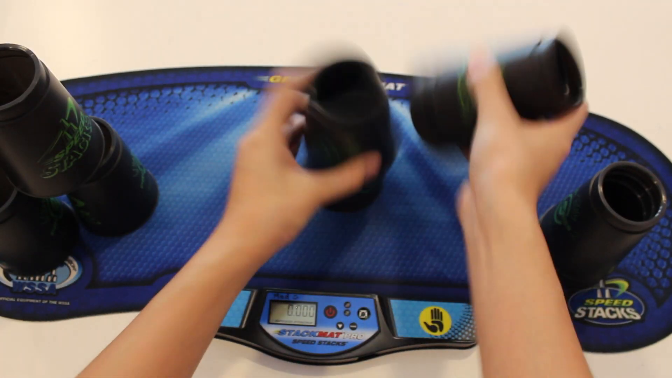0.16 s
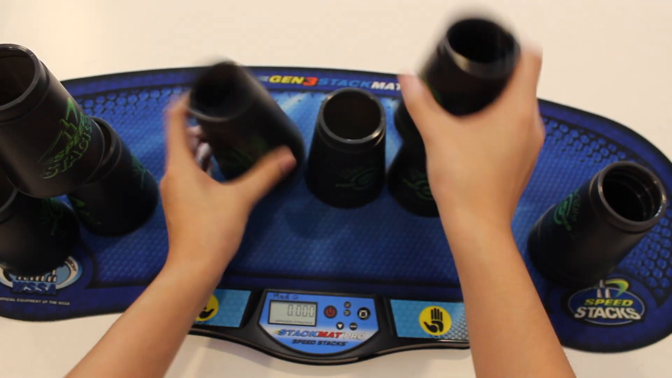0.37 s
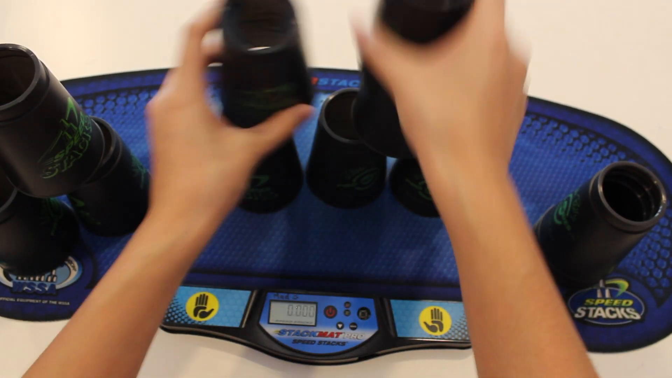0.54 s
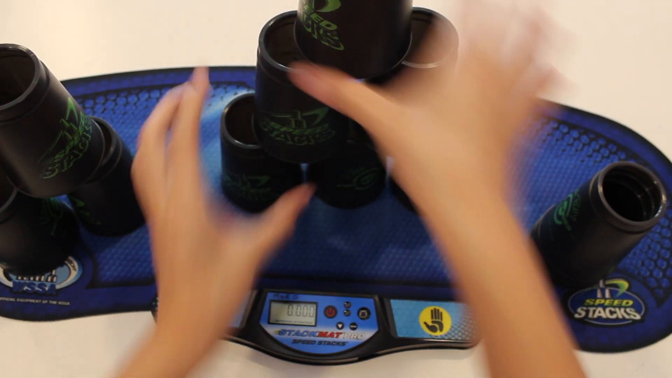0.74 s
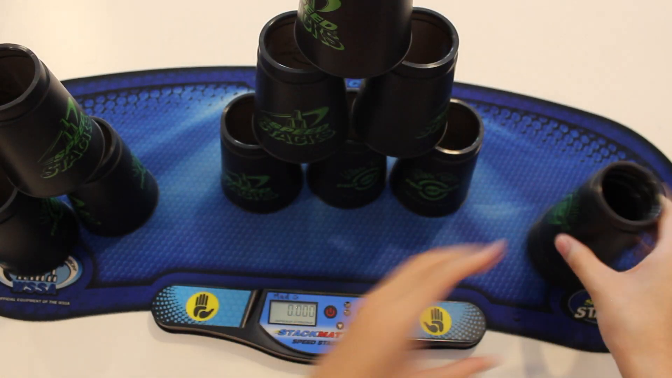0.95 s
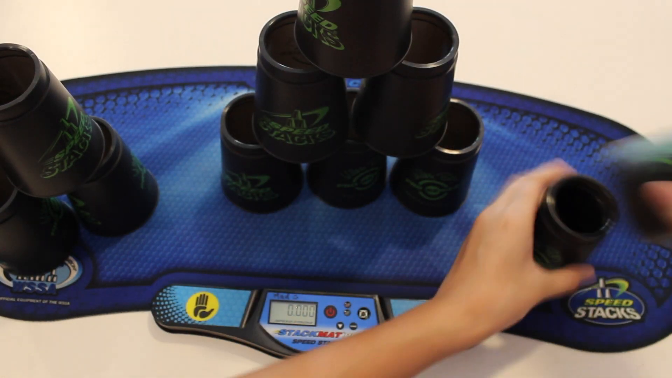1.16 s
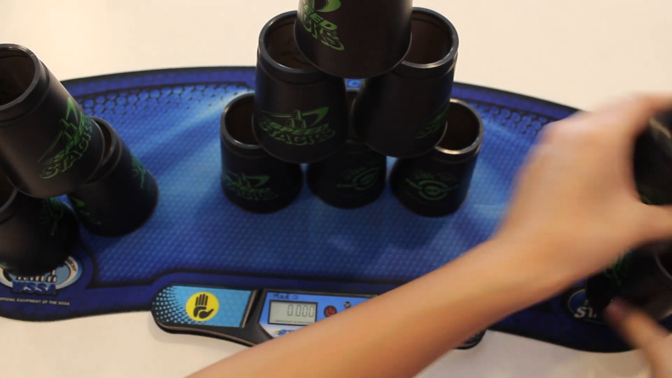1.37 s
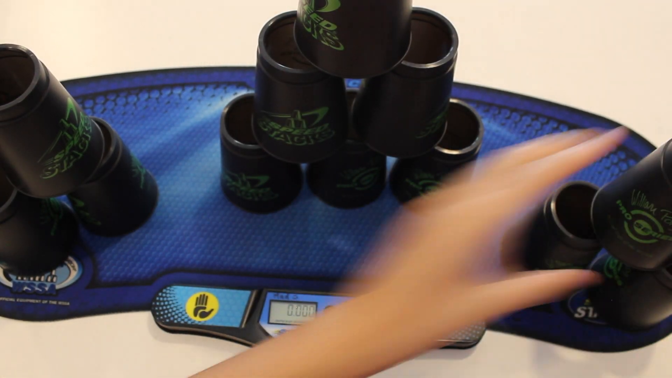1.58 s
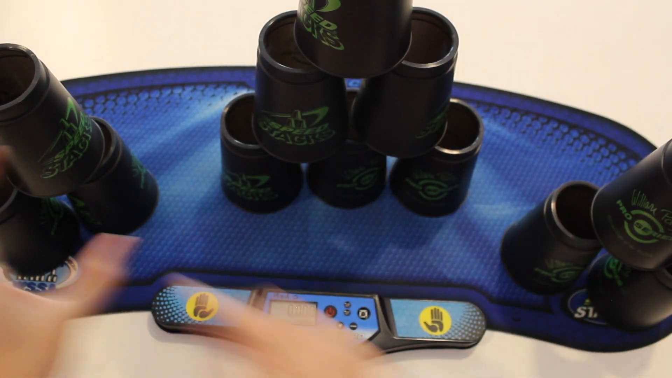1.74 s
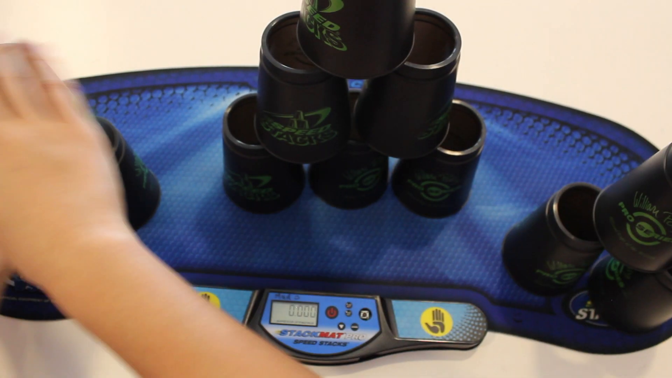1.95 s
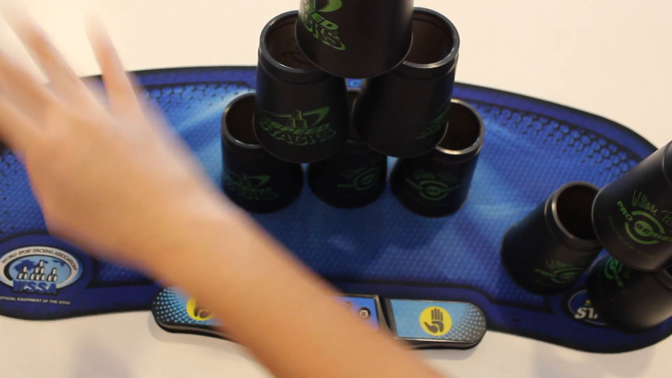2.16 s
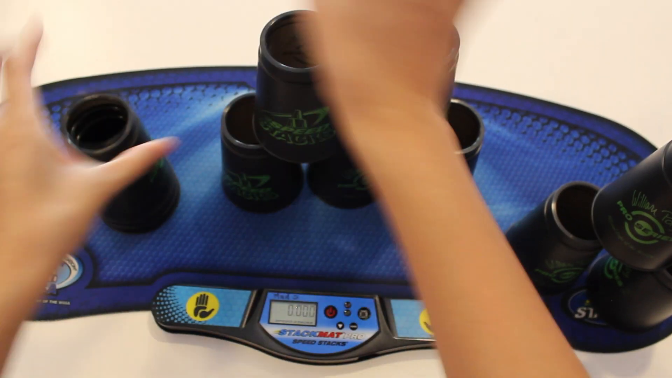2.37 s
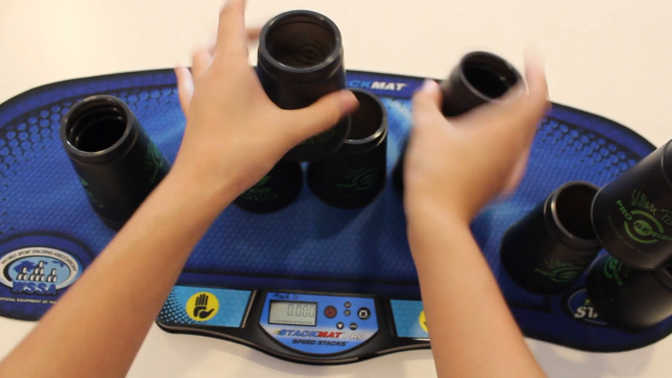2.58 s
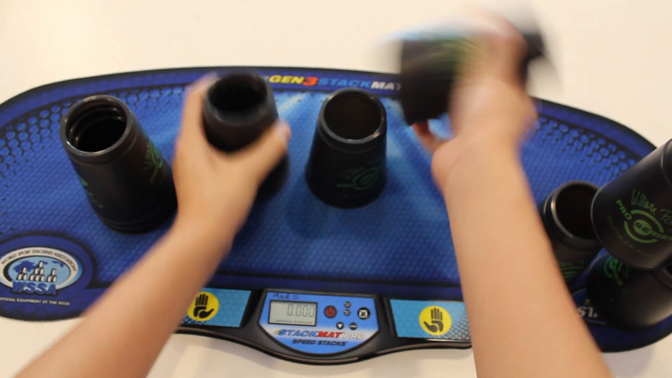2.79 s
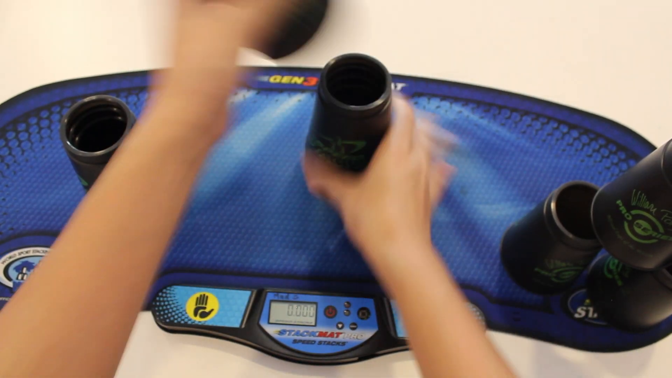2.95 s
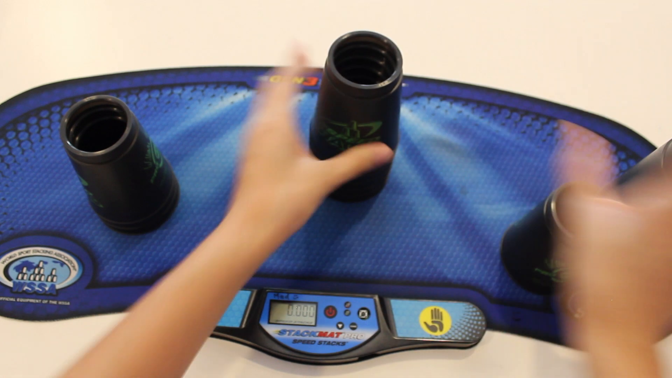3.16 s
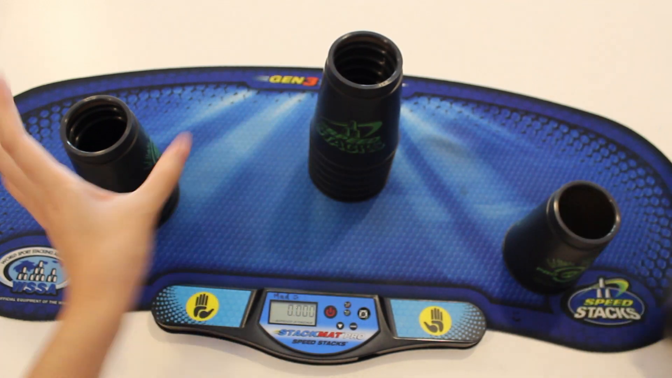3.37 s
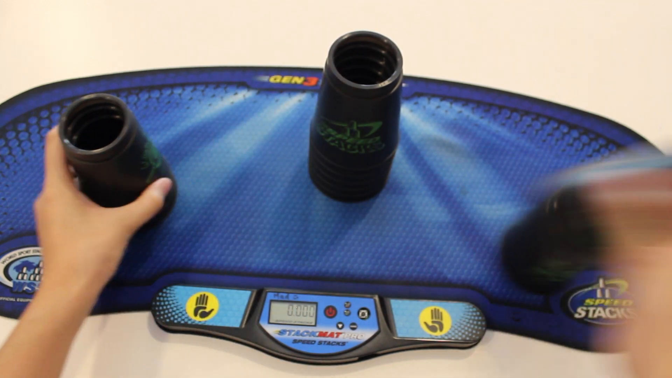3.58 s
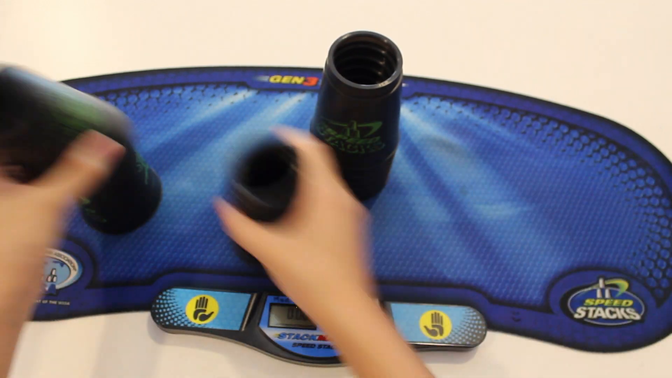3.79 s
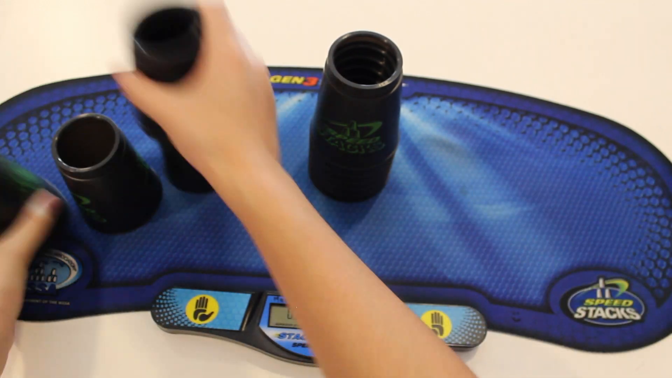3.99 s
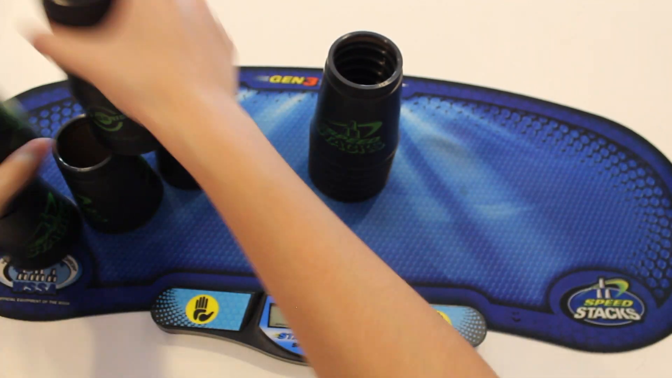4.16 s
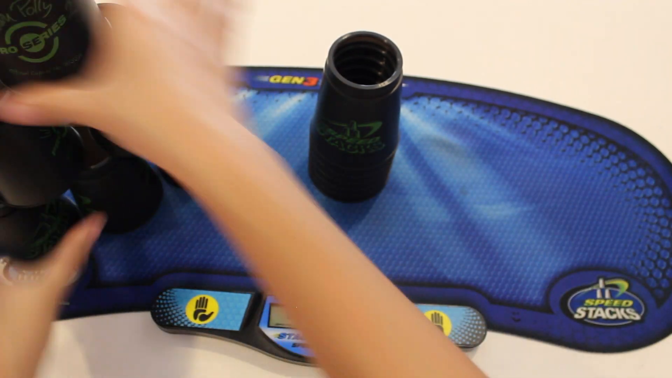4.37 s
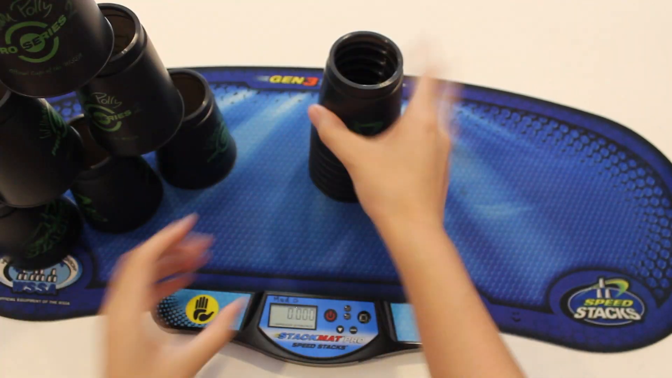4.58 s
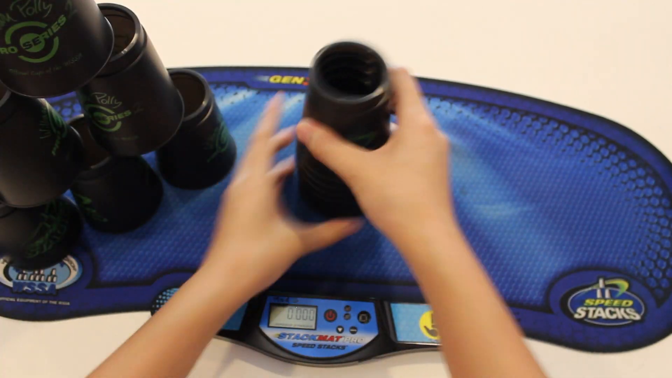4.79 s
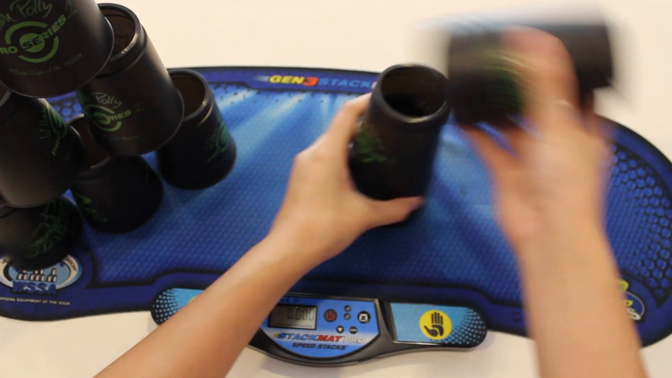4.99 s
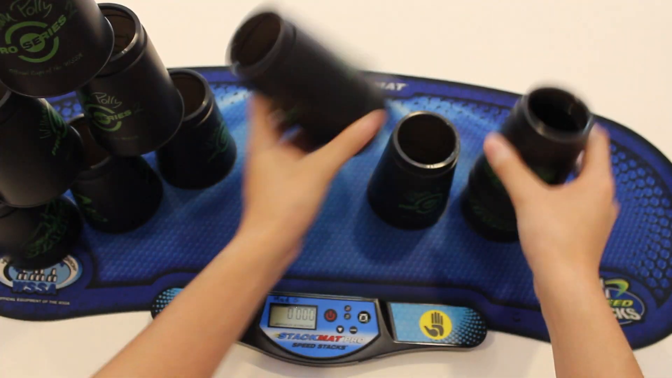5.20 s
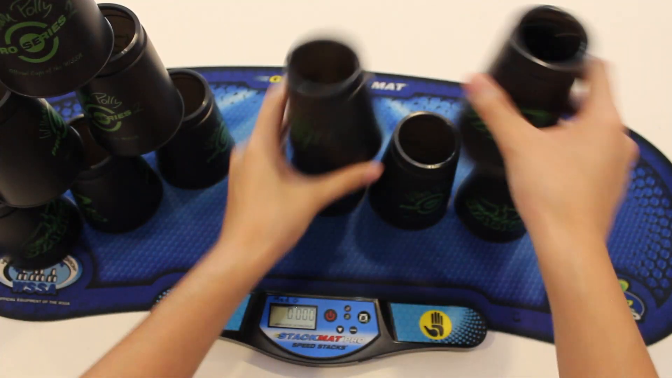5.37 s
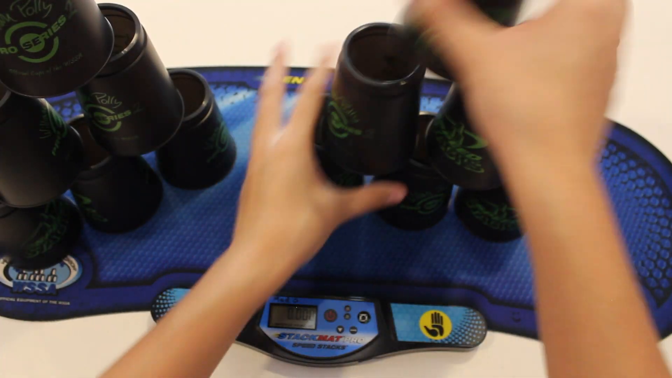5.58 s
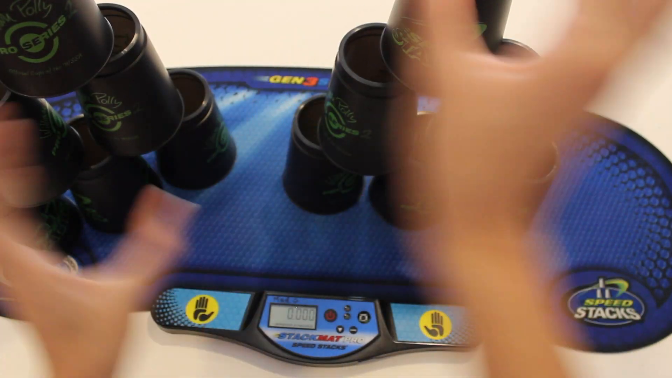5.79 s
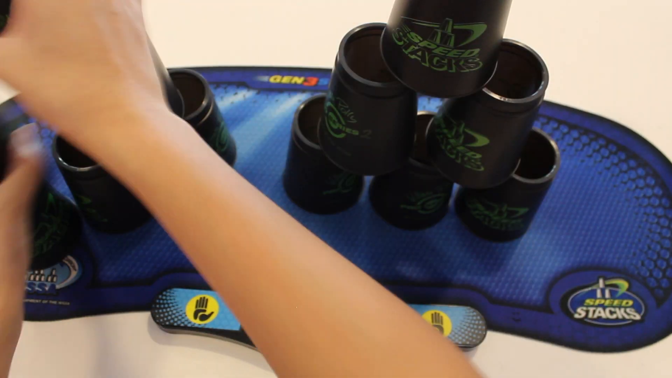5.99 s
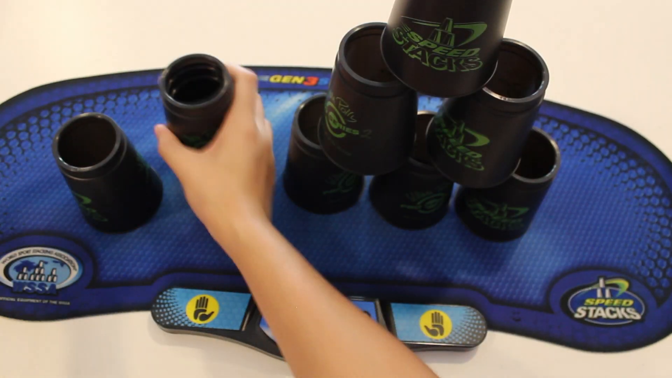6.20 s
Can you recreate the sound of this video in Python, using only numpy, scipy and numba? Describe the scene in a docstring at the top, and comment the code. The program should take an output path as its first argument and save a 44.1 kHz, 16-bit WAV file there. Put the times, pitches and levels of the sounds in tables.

```python
"""Hard plastic cups are stacked and unstacked fast on a thin mat over a table, close to a small microphone.
It opens with clacks, thuds and a brief rim squeak, over rustling hands and quiet room air. Sparser knocks
follow, then a busy run from about 2 s, scattered groups from 4 s and a dense burst with rising rustle at the end.
Each contact is a noisy crack, a short ring of the cup wall and a hollow knock of the air inside; cups slide
with a grainy hiss, a small room answers with fading noise, and the loudest clacks overload the recorder."""
import sys
import numpy as np
from scipy import signal
from scipy.fft import rfft, irfft
from scipy.io import wavfile
from scipy.ndimage import uniform_filter1d
from numba import njit

SR = 44100
rng = np.random.default_rng(int(sys.argv[2]) if len(sys.argv) > 2 else 0)


def pcm_store(signal):
    """Save signal as 16-bit PCM."""
    levels = np.round(np.clip(np.atleast_2d(signal), -1, 1) * 32767)
    wavfile.write(sys.argv[1], SR, levels.astype(np.int16).T)


def how_loud(loudness_db):
    """Turn decibels into a plain amplitude multiplier (0 dB gives 1, 20 dB gives 10)."""
    steps = np.asarray(loudness_db, float) / 20
    return 10 ** steps


N = 275184

# room air, its tone colour: (frequency [Hz], relative level per Hz [dB])
AIR_COLOUR = [(20, -10), (75, -9.5), (100, 2), (135, -14.5), (195, 3), (245, -15), (700, 0.5), (1500, -8.5),
              (3400, -17.5), (9600, -30), (16000, -29)]
# hands moving cups over the mat: (time [s], rustle level [dB])
HANDS = [(0.0, -50), (0.6, -35.5), (0.85, -77), (1.08, -51.5), (1.34, -45), (1.7, -68), (1.92, -52.5),
         (2.05, -42), (3.1, -42.5), (3.44, -41.5), (3.6, -48), (4.25, -40), (4.48, -83), (4.69, -52),
         (5.06, -44.5), (5.7, -33), (5.9, -56.5), (6.24, -29.5)]
# skin and rims on the mat, tone colour: (frequency [Hz], relative level [dB])
RUSTLE_COLOUR = [(500, 0), (1300, 0), (3000, -4.5), (5500, -10.5), (8000, -16), (16000, -23.5)]
# table top and standing cups, shaken by every knock:
# (frequency [Hz], relative level [dB], time to fall by 60 dB [s])
TABLE_MODES = [(203.2, -13, 0.18), (272.8, 1.5, 0.067), (294.2, -1, 0.11), (364, -4, 0.17),
               (399.3, -11, 0.18), (442.5, -2.5, 0.086), (555.4, -6, 0.12), (622, -1, 0.056),
               (696, -2, 0.073), (765.7, -4.5, 0.08), (906, -21, 0.19), (1018, -12, 0.093),
               (1130, -19, 0.11), (1240, -17, 0.048)]
# a rim drags its wall tone along:
# (time [s], length [s], start frequency [Hz], end frequency [Hz], level [dB])
SQUEAKS = [(.335, 0.071, 2900, 3450, -35.5), (9, 0.1, 3500, 2200, -42), (.345, 0.048, 5400, 5900, -37.5)]
# cups drawn out of or dropped into each other: (time [s], length [s], level [dB], centre frequency [Hz])
RUBS = [(0.008, 0.052, -42, 3800), (0.337, 0.072, -35.5, 4700), (1.05, 0.12, -53.5, 3000),
        (1.188, 0.17, -54.5, 2180), (1.291, 0.072, -44, 400), (1.955, 0.019, -29.5, 1760),
        (2.027, 0.016, -28.5, 1310), (2.13, 0.022, -35, 2520), (2.323, 0.085, -40, 4440),
        (2.502, 0.062, -26, 2200), (2.648, 0.035, -29.5, 1920), (2.754, 0.081, -39, 3600),
        (2.906, 0.063, -42, 3100), (3.308, 0.06, -34, 3500), (3.413, 0.057, -34, 1950),
        (3.68, 0.023, -27, 2670), (3.712, 0.02, -17.5, 2900), (3.744, 0.048, -26.5, 2310),
        (3.79, 0.075, -31, 1910), (4.081, 0.019, -33, 3000), (4.879, 0.1, -37.5, 1900),
        (5.037, 0.083, -38, 3600), (5.221, 0.05, -37, 2800), (5.369, 0.061, -36, 3000),
        (6.013, 0.045, -35.5, 1750), (6.128, 0.039, -41, 3100)]
# colour of a rub: (multiple of its centre frequency [-], relative level [dB])
RUB_COLOUR = [(.15, -15), (.4, 1), (1, 1.5), (2.2, -3.5), (5, -16), (12, -32)]
# room echo: (band centre [Hz], time for the main decay to fall by 60 dB [s], relative level [dB])
ROOM_BANDS = [(259, 0.19, -11.5), (663, 0.25, -5.5), (1300, 0.27, -7), (3000, 0.32, -13), (5660, 0.26, -10),
              (12600, 0.14, -11)]
# cup wall tones before chance shifts: (frequency [Hz], relative level [dB], time to fall by 60 dB [s])
WALL_MODES = [(1240, -5.5, 0.024), (1670, 13.5, 0.0041), (1944, 0, 0.017), (2860, -9, 0.038),
              (2990, -4, 0.033), (3300, -3.5, 0.036), (3965, -3.5, 0.034), (5470, 3.5, 0.016),
              (6410, -7.5, 0.039)]
# colour of a crack: (frequency [Hz], relative level [dB])
CRACK_COLOUR = [(800, 2.5), (2000, 1), (5000, 6.5), (7500, 0), (12000, -5), (17000, -11.5)]
# rim strikes rim:
# (time [s], relative crack level [dB], loudest wall tone [Hz], relative wall level [dB])
CLACKS = [(0.0034, -26, 2930, -25), (0.1402, -35, 1590, -31), (0.193, -24, 1230, -17),
          (0.4541, -3, 3100, -2), (0.7194, 1, 1350, 4.5), (1.9607, -37, 2150, -16),
          (2.032, -17.5, 1120, -6), (2.0764, -8, 3300, -7.5), (2.0967, -7, 5340, -6),
          (2.101, -21, 1530, -7.5), (2.1064, -4, 3130, -0.5), (2.1508, 3, 1945, -1),
          (2.191, -14.5, 1830, -3), (2.3142, -20.5, 5700, -36), (2.3423, -26, 1220, -35),
          (2.366, -12, 4880, -28), (2.4299, -19, 1380, -14), (2.49, -9.5, 4550, -25),
          (2.495, -8, 2800, -43), (2.577, -0.5, 2100, -4.5), (2.6273, -22, 3160, -11.5),
          (2.6416, -12, 1440, -3.5), (2.744, -15.5, 3300, -18), (2.77, -46.5, 3200, -26),
          (2.9117, -22.5, 3200, -20), (2.928, -24, 3050, -22), (2.957, -19, 2730, -19),
          (3.0668, -16, 5500, -36.5), (3.113, -25, 1360, -27), (3.1238, -2.5, 1354, 1),
          (3.688, -13, 1290, -23), (3.711, -7.5, 1890, -9), (3.7838, -9.5, 1730, -2),
          (3.823, -16.5, 1560, -20), (4.119, -15, 1790, -29), (4.2133, -16, 1560, -3),
          (4.2658, -23, 1115, -10), (4.312, -28, 1060, -9), (4.3604, -2, 1310, 4.5),
          (5.044, -25, 4300, -23.5), (5.0756, -38, 4500, -20.5), (5.2057, -17, 3030, -15.5),
          (5.2231, -25, 1780, -16), (5.2805, -15, 4050, -15), (5.3578, -1.5, 3020, -0.5),
          (5.5194, -28, 3950, -15), (5.6483, -32, 1240, -7), (6.073, -22, 1210, -42),
          (6.082, -28, 1240, -11), (6.0897, -8, 4700, -6), (6.0929, -0.5, 2960, -11),
          (6.1137, -5.5, 5770, -11), (6.124, -11, 5300, -25), (6.1296, -8, 4700, -37),
          (6.1607, -16, 1820, -34), (6.1714, 5, 2040, 4), (6.1912, -19, 2770, -23)]
# a cup lands mouth down and squeezes its air: (time [s], relative crack level [dB],
# loudest wall tone [Hz], air cavity tone [Hz], relative hollow level [dB])
LANDINGS = [(0.1518, -52, 1040, 250, -18.5), (0.2667, -54, 2700, 325, -13.5), (0.3147, -52, 1084, 314, -29),
            (0.325, -32.5, 2900, 268, -11.5), (0.4418, -10.5, 3170, 350, -16), (0.45, -35, 2830, 290, -1.5),
            (0.5495, -4, 1940, 628, 3), (0.6735, -10.5, 1330, 597, 1), (0.6856, -11.5, 1300, 610, -1),
            (1.022, -42, 1700, 266, -25.5), (1.068, -43, 1600, 378, -36), (1.106, -41.5, 1110, 423, -46),
            (1.245, -43, 4870, 390, -45), (1.3913, -28.5, 2320, 405, 4), (1.4047, -25.5, 1440, 418, 10),
            (1.4868, 1, 1433, 717, 10.5), (1.4935, -26, 1310, 716, -0.5), (2.0152, -41, 1240, 244, -17),
            (2.021, -32.5, 1100, 276, -12), (2.0438, -22, 1120, 264, -11.5), (2.4073, -32, 1450, 303, -26),
            (2.4431, -3.5, 1560, 315, -1.5), (2.5003, -24, 2950, 646, -13.5),
            (2.5437, -14.5, 2970, 590, -13), (2.5539, -41.5, 1280, 650, -8.5), (2.6896, -8, 1700, 848, 0.5),
            (2.7825, -18, 3100, 382, -17), (2.794, -19, 5080, 590, -15.5), (2.8347, -27, 3400, 354, -18),
            (2.904, -26, 1740, 279, -19.5), (2.972, -2.5, 3130, 310, 2.5), (3.278, -58, 1130, 630, -20),
            (3.2965, -31, 1340, 570, -22), (3.3091, -14.5, 3050, 430, -12.5),
            (3.4087, -40, 1270, 440, -18.5), (3.4235, -20.5, 1540, 434, -16), (3.645, -9.5, 3490, 556, 4),
            (3.6561, -14, 1170, 396, -6.5), (3.6829, -12, 1260, 840, -16), (3.7166, -10, 3060, 300, -5),
            (3.729, -8.5, 1950, 370, -4), (3.8258, -21, 1490, 694, -16.5), (4.0086, -42, 1610, 308, -22.5),
            (4.0492, -25, 3300, 298, -7.5), (4.0558, -25.5, 4200, 306, -16.5),
            (4.0791, -18, 2600, 584, -11.5), (4.0878, -31, 3000, 484, -7), (4.1287, -23, 1770, 645, -11.5),
            (4.199, -1, 4250, 645, 6), (4.2903, -10, 1270, 650, -3.5), (4.3024, -11, 1550, 633, 0.5),
            (4.6653, -25.5, 3660, 342, -22.5), (4.8703, -21, 1240, 340, -11),
            (4.8958, -26.5, 3040, 364, -20), (4.9421, -25, 1590, 348, -15), (5.0963, -36, 1200, 400, -24),
            (5.1197, -61.5, 4960, 280, -14), (5.1563, -30, 3220, 263, -21), (5.2014, -60, 1920, 282, -0.5),
            (5.215, -22, 3150, 248, -8.5), (5.351, -26, 1230, 320, 5.5), (5.383, -20, 2860, 370, -4.5),
            (5.4805, -9.5, 1070, 625, 7), (5.5109, -12, 1550, 620, -1), (5.5438, -21, 1570, 680, -13),
            (5.569, -9, 1240, 578, -1.5), (5.6144, -11.5, 1350, 660, -1.5), (5.6648, -0.5, 1240, 622, 5.5),
            (6.0126, -30.5, 1390, 623, -15.5), (6.0622, -21, 1180, 620, -15), (6.1739, -23, 2560, 850, -10),
            (6.2297, -2, 3660, 323, -4.5)]

AIR_DB = -49.5  # average level before the recorder
RUMBLE_DB = -1.5  # through the table, against the rustle
# neighbours shuffle after a landing, against its thud
JOSTLE_DB, JOSTLE_RISE_S, JOSTLE_FALL_S = -38.5, 0.02, 0.031
BODY_TO_ROOM_DB = -8.5  # the narrow tones reach the walls more weakly than the broad blow
# air tone of a struck open cup, against its wall tone; high clacks stir it less
OPEN_CUP_HZ, CLACK_AIR_DB, CLACK_AIR_DB_PER_OCTAVE = 620, -8.5, -3
# wall ring of a landing grows with its crack and its thud (dB per dB)
WALL_PER_CRACK, WALL_PER_HOLLOW, LANDING_WALL_DB = 0.71, 0.28, 1.5
LANDING_WALL_DB_PER_OCTAVE = -3.5  # the mat damps the higher wall tones
TICKS_PER_S, TICK_DB, TICK_SPREAD_DB = 10, 4.5, 4.5  # stray light touches, against the rustle


def colour(x, points):
    """Shapes a signal by (Hz, dB) points without sounding ahead of it (minimum phase)."""
    hz, db = np.transpose(points)
    grid = np.linspace(1, SR / 2, 2049)
    log_gain = np.interp(np.log(grid), np.log(hz), db) * np.log(10) / 20
    # folding the cepstrum forward in time makes the filter minimum phase
    cepstrum = irfft(log_gain)
    cepstrum[1:2048] *= 2
    cepstrum[2049:] = 0
    response = irfft(np.exp(rfft(cepstrum)))[:2048]
    return signal.fftconvolve(x, response)[:len(x)]


def unit(x):
    """Scales to an average (rms) level of 1."""
    return x / np.sqrt(np.mean(x ** 2))


def ring(x, hz, t60):
    """One fading tone driven by x; a single unit push rings at amplitude 1 and falls 60 dB in t60 s."""
    r = np.exp(-np.log(1000) / (t60 * SR))
    w = 2 * np.pi * hz / SR
    return signal.lfilter([0, r * np.sin(w)], [1, -2 * r * np.cos(w), r * r], x)


def add(out, s, x):
    """Mixes x in at time s."""
    i = int(s * SR)
    out[i:i + len(x)] += x[:len(out) - i]


def quiet_air():
    """The quiet air of the room: steady coloured noise."""
    return how_loud(AIR_DB) * unit(colour(rng.standard_normal(N), AIR_COLOUR))


def hands_db(s):
    """Rustle level at time s."""
    return np.interp(s, *np.transpose(HANDS))


def table(shove):
    """Low tones of the table top and of the cups that stand on it, shaken by a push."""
    return sum((-1) ** k * how_loud(db) * ring(shove, hz, t60) for k, (hz, db, t60) in enumerate(TABLE_MODES))


def handling():
    """Hands and cups moving on the mat rustle and shake the table a little, more so just after a landing."""
    power = how_loud(2 * hands_db(np.arange(N) / SR))
    t = np.arange(SR // 2) / SR
    jostle = (1 - np.exp(-t / JOSTLE_RISE_S)) * np.exp(-t / JOSTLE_FALL_S)
    for s, _, _, _, hollow_db in LANDINGS:
        add(power, s, how_loud(2 * (hollow_db + JOSTLE_DB)) * jostle ** 2)
    rumble = unit(table(rng.standard_normal(N)))
    flicker = how_loud(1.6 * unit(uniform_filter1d(rng.standard_normal(N), 300)))
    rustle = unit(colour(rng.standard_normal(N) * flicker, RUSTLE_COLOUR))
    return np.sqrt(power) * (how_loud(RUMBLE_DB) * rumble + rustle)


def squeaks():
    """A rubbed rim sings in a rough, narrow band that glides as the cups part."""
    out = np.zeros(N)
    for s, length, from_hz, to_hz, db in SQUEAKS:
        n = int(length * SR)
        glide = np.exp(2j * np.pi * np.cumsum(np.linspace(from_hz, to_hz, n)) / SR)
        # slow noise on the gliding tone makes it rough
        a, b = uniform_filter1d(rng.standard_normal((2, n)), 110)
        song = unit(np.real((a + 1j * b) * glide))
        add(out, s, how_loud(db) * song * signal.windows.tukey(n, 0.4))
    return out


def rubs():
    """Ridged walls slide over each other: a grainy hiss that also keeps the wall tones ringing."""
    out = np.zeros(N)
    for s, length, db, centre_hz in RUBS:
        n = int(length * SR) + 2048  # room for the fade
        t = np.arange(n) / SR
        grain = how_loud(1.5 * unit(uniform_filter1d(rng.standard_normal(n), 90)))
        push = rng.standard_normal(n) * grain
        # ridges catch now and then, about 500 times a second: small ticks in the hiss
        push = push * (1 + 5.9 * (rng.random(n) < 500 / SR))
        # wall tones far from the centre of the rub answer less
        walls = sum(how_loud(mode_db - 6.1 * abs(np.log2(hz / centre_hz))) * unit(ring(push, hz, t60))
                    for hz, mode_db, t60 in WALL_MODES)
        hiss = colour(push, [(k * centre_hz, gain_db) for k, gain_db in RUB_COLOUR])
        shape = np.clip(t / 0.0027, 0, 1) * np.exp(-np.maximum(t - length, 0) / 0.018)
        add(out, s, how_loud(db) * shape * unit(unit(hiss) + 0.5 * unit(walls)))
    return out


def room(x):
    """Diffuse echo: noise that dies away band by band, starting after the first wall."""
    t = np.arange(SR) / SR
    tail = 0
    for hz, t60, db in ROOM_BANDS:
        sos = signal.butter(2, [hz / 1.5, hz * 1.5], "band", fs=SR, output="sos")
        band = signal.sosfilt(sos, rng.standard_normal(len(t)))
        # the near corner dies fast, the rest of the house lingers
        near = np.exp(-np.log(1000) * t / t60)
        far = how_loud(-23) * np.exp(-np.log(1000) * t / (2.74 * t60))
        band = band * (near + far) * (1 - np.exp(-(t / 0.00097) ** 2))
        # energy in step with band width
        tail = tail + how_loud(db) * band * np.sqrt(2 * hz / SR / np.sum(band ** 2))
    return signal.fftconvolve(x, tail)[:N]


def hits():
    """Every contact as (time, crack dB, wall Hz, wall dB, air Hz, hollow dB), with stray touches by chance."""
    rows = []
    for s, db, hz, wall_db in CLACKS:
        octaves = np.log2(hz / OPEN_CUP_HZ / 2)
        hollow_db = wall_db + CLACK_AIR_DB + CLACK_AIR_DB_PER_OCTAVE * octaves
        rows.append((s, db, hz, wall_db, OPEN_CUP_HZ, hollow_db))
    for s, db, hz, air_hz, hollow_db in LANDINGS:
        octaves = np.log2(hz / OPEN_CUP_HZ / 2)
        wall_db = WALL_PER_CRACK * db + WALL_PER_HOLLOW * hollow_db + LANDING_WALL_DB
        wall_db = wall_db + LANDING_WALL_DB_PER_OCTAVE * octaves
        rows.append((s, db, hz, wall_db, air_hz, hollow_db))
    for when, size, mode, air in rng.random((100, 4))[:int(TICKS_PER_S * N / SR)]:
        s = when * N / SR
        db = hands_db(s) + TICK_DB + TICK_SPREAD_DB * (2 * size - 1)
        wall_hz = WALL_MODES[int(mode * len(WALL_MODES))][0]
        rows.append((s, db, wall_hz, db, OPEN_CUP_HZ * 2 ** -air, db))
    return rows


def hollow_knock(tap, t, air_hz, shift):
    """The trapped air takes a cycle to swing up, and the facing cup answers a little higher."""
    facing = np.sign(shift[0]) * ring(tap, 1.47 * air_hz * (1 + 0.12 * shift[1]), 0.029)
    air = ring(tap, air_hz, 0.028) + how_loud(-13.5) * facing
    return air * (1 - np.exp(-t / 0.0011))


def wall_ring(tap, t, wall_hz, hardness_db, shift, share):
    """The grip picks the loudest wall tone; the others fade with distance from it."""
    # a squeezed cup is not quite round, so that tone splits into a beating pair
    wall = ring(tap, wall_hz, 0.019) + how_loud(-5) * ring(tap, wall_hz * (1 + 0.08 * share[0]), 0.02)
    for (hz, db, t60), a, b in zip(WALL_MODES, shift, share):
        octaves = np.log2(hz / wall_hz)
        # a soft contact spares the high tones
        far_db = -7.0 * abs(octaves) + 0.087 * max(octaves, 0) * min(hardness_db, 0)
        gain = how_loud(db + far_db - 7.5 + 4.86 * b) * np.sign(a)
        wall = wall + gain * ring(tap, hz * (1 + 0.0374 * a), t60)
    return wall * (1 - np.exp(-t / 0.00077))


def crack_burst(grit, t, soft):
    """Rims do not meet at once: a quick rise, then a few ms of grit, duller for a soft contact."""
    burst = grit * (1 - np.exp(-t / 0.00016)) * np.exp(-t / 0.002)
    return signal.lfilter([1], [1, -soft], burst / np.sqrt(np.sum(burst ** 2)))


def contacts():
    """Crack of every contact, the broader blow that spreads into the room, and the ring and hollow knock."""
    crack, tick, blow, cup, shove = np.zeros((5, N))
    t = np.arange(4096) / SR
    tap = 1.0 * (t == 0)
    rows = hits()
    noise = rng.standard_normal((len(rows), 512))
    chance = rng.standard_normal((len(rows), 2, len(WALL_MODES)))
    for row, grit, (shift, share) in zip(rows, noise, chance):
        s, crack_db, wall_hz, wall_db, air_hz, hollow_db = row
        # a contact that is mostly hollow thud is softer
        soft = np.clip(0.28 + 0.023 * (hollow_db - crack_db), 0, 0.8)
        add(crack, s, how_loud(crack_db) * crack_burst(grit, t[:512], soft))
        add(tick, s, how_loud(crack_db) * soft ** np.arange(64))
        # summed over all directions the tones smear into broad humps
        wall_hump = how_loud(wall_db - 1.5) * ring(tap, wall_hz, 0.0052)
        air_hump = how_loud(hollow_db + 7.0) * ring(tap, air_hz, 0.0056)
        add(blow, s, wall_hump + air_hump)
        add(cup, s, how_loud(wall_db) * wall_ring(tap, t, wall_hz, crack_db - wall_db, shift, share))
        add(cup, s, how_loud(hollow_db) * hollow_knock(tap, t, air_hz, shift))
        add(shove, s, how_loud(hollow_db) * grit * np.exp(-t[:512] / 0.0015))
    crack = how_loud(16) * colour(crack, CRACK_COLOUR)
    short_walls = sum(how_loud(db) * ring(tick, hz, 0.14 * t60) for hz, db, t60 in WALL_MODES)
    spread = how_loud(13.5) * colour(tick, CRACK_COLOUR) + how_loud(-8.5) * short_walls + blow
    return crack, spread, cup + how_loud(-31.0) * table(shove)


def scene():
    """Cups, table, room echo and the quiet air of the room."""
    crack, spread, body = contacts()
    slides = rubs() + squeaks()
    echo = room(spread + how_loud(BODY_TO_ROOM_DB) * body + slides)
    cups = crack + body + slides + echo + handling()
    # cups, table and echo are cut steeply below about 170 Hz
    cups = signal.sosfilt(signal.butter(3, 170, "high", fs=SR, output="sos"), cups)
    return (cups + quiet_air())[None]


@njit
def follow(x, attack, release):
    """Level detector, quick to rise and slow to fall."""
    out, e = np.empty(len(x)), 0.
    for i in range(len(x)):
        e += (abs(x[i]) - e) * (attack if abs(x[i]) > e else release)
        out[i] = e
    return out


def roll_off(x):
    """The treble ends steeply here."""
    return signal.sosfilt(signal.butter(12, 16480, fs=SR, output="sos"), x)


def record(dry):
    """The microphone ends below 16 kHz; gain control turns down too late to keep loud first peaks from clipping."""
    level = follow(dry[0], 1 / (0.0029 * SR), 1 / (0.12 * SR))  # 2.9 ms rise, 120 ms fall
    dry = signal.sosfilt(signal.ellip(6, 0.3, 50, 15800, fs=SR, output="sos"), dry)
    held = how_loud(0.5) * dry * (1 + level / how_loud(-30)) ** -0.2
    return roll_off(np.clip(held, -0.98, 0.98))


dry = scene()
out = record(dry)
pcm_store(out)
```